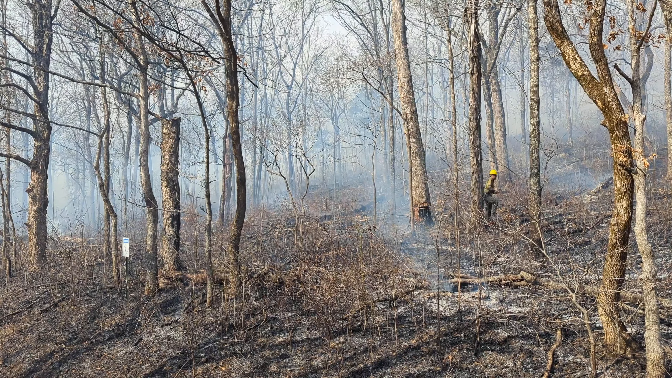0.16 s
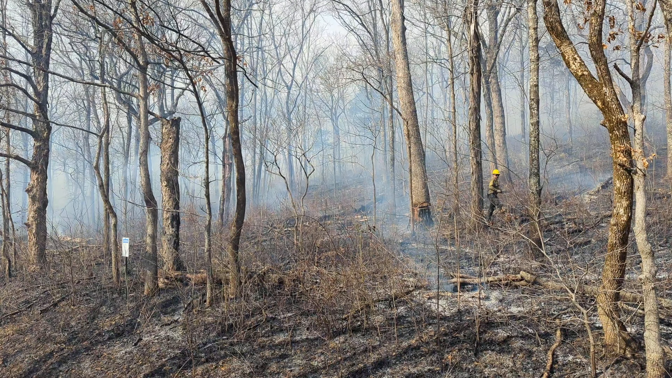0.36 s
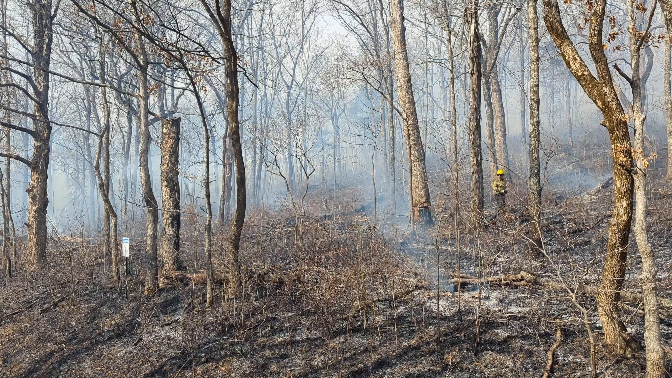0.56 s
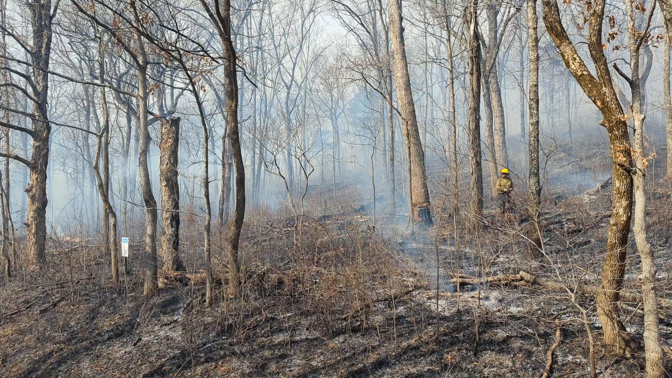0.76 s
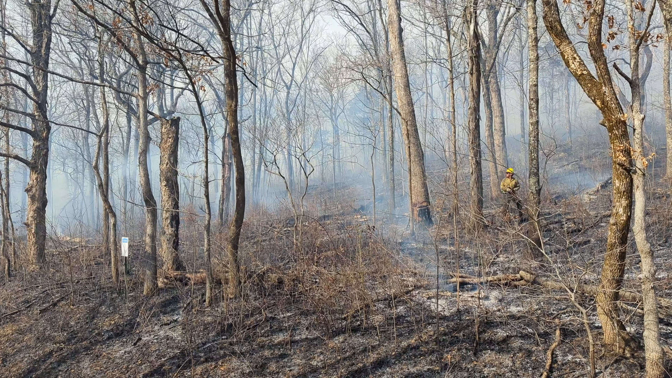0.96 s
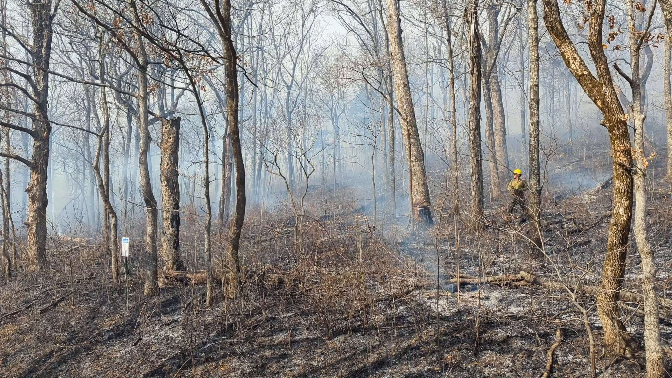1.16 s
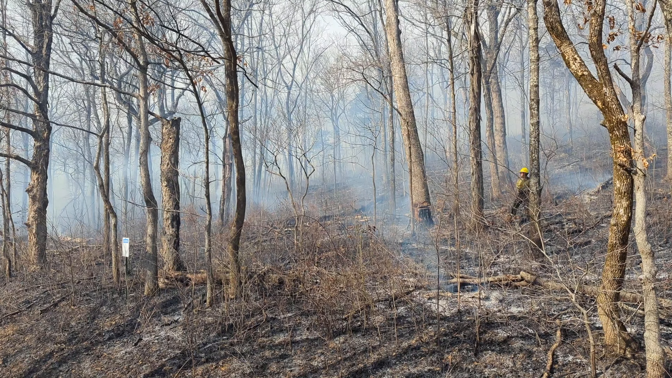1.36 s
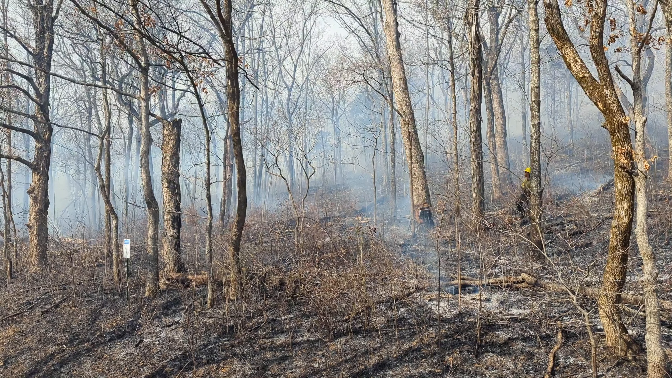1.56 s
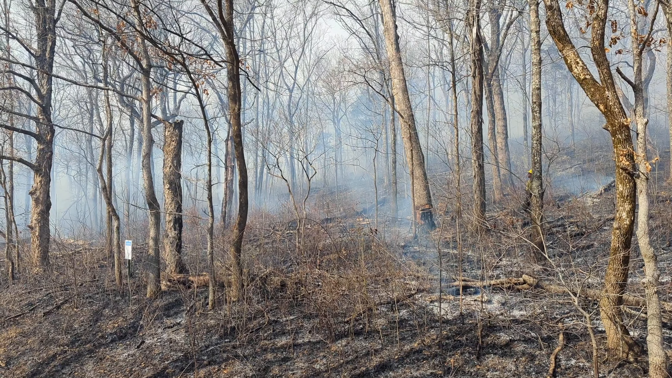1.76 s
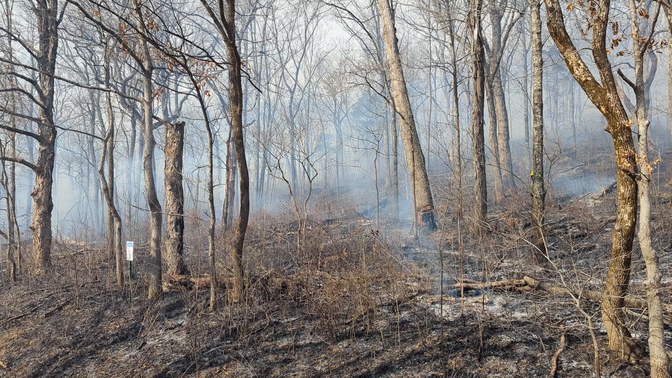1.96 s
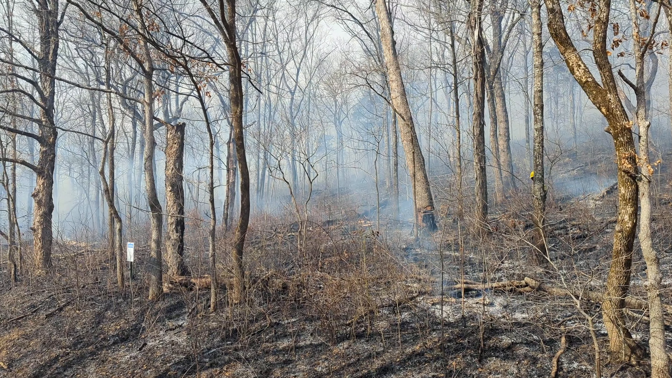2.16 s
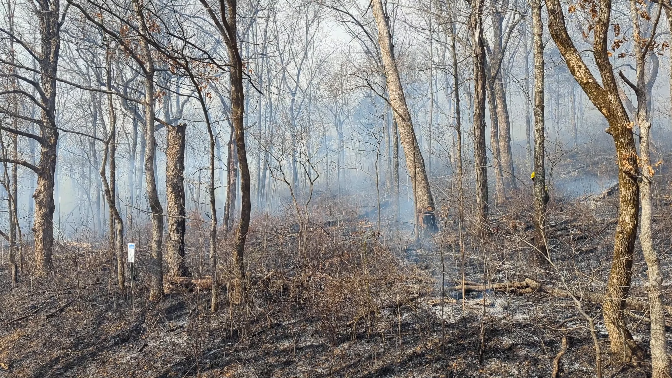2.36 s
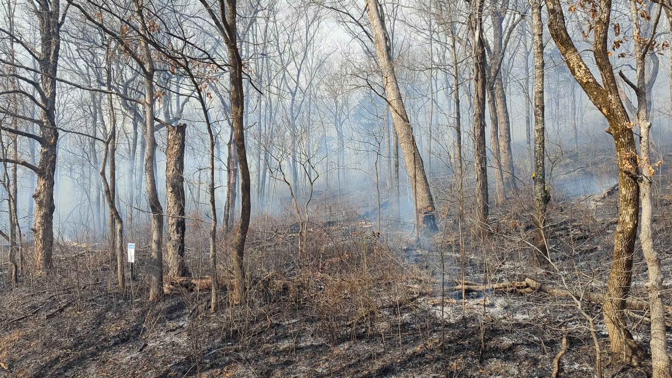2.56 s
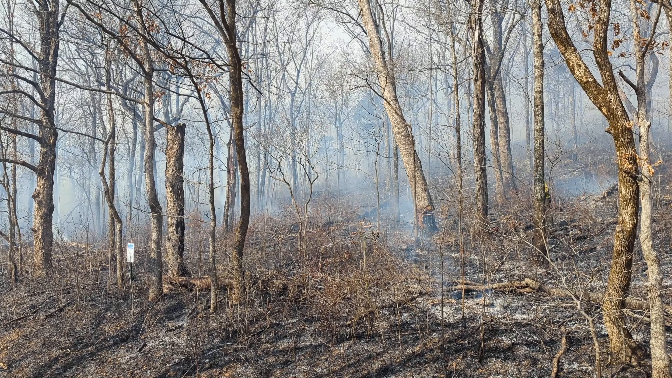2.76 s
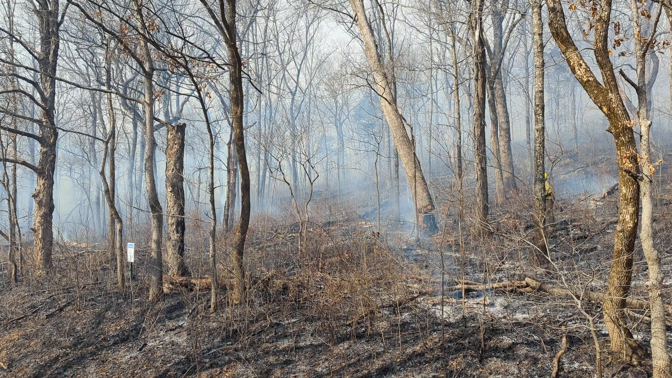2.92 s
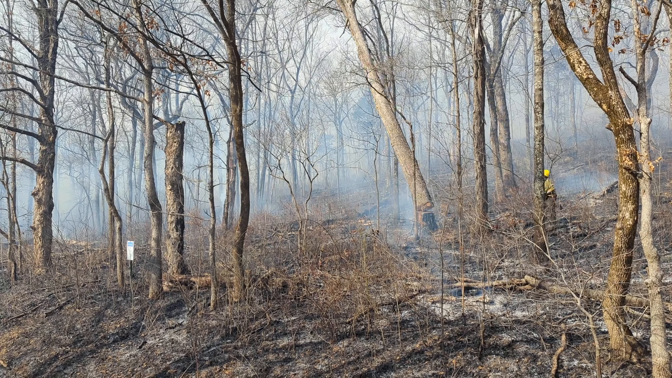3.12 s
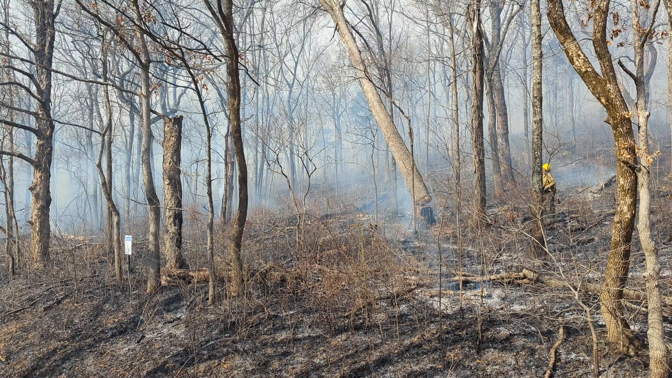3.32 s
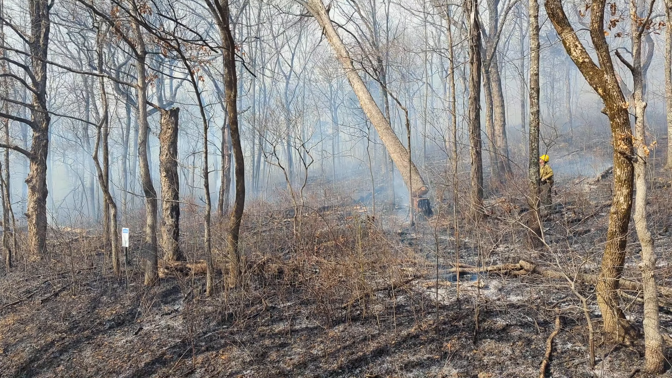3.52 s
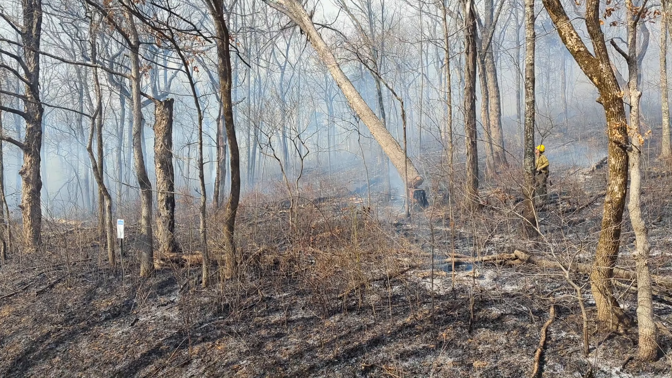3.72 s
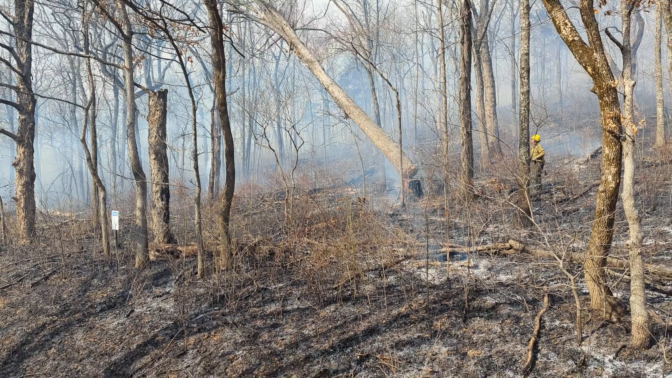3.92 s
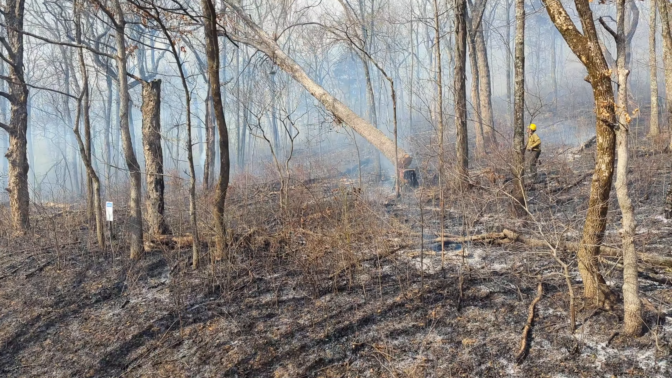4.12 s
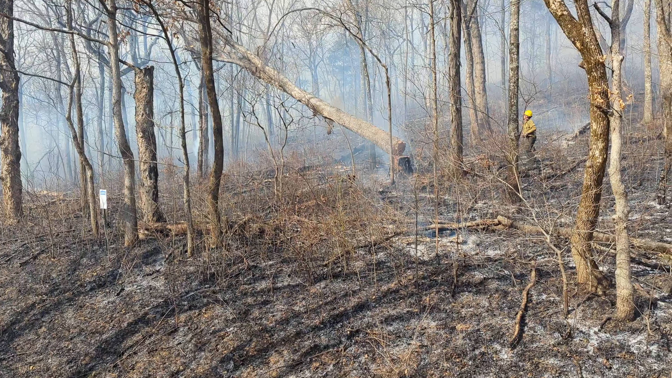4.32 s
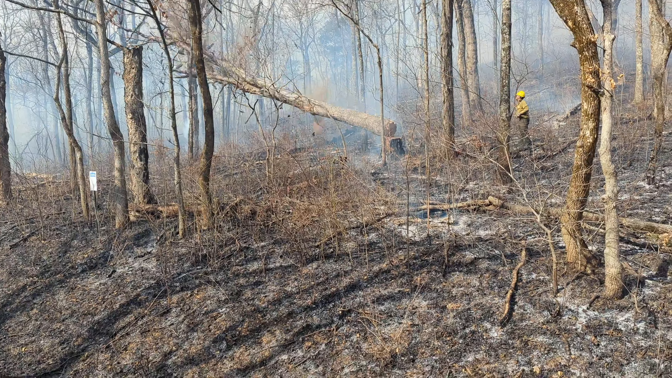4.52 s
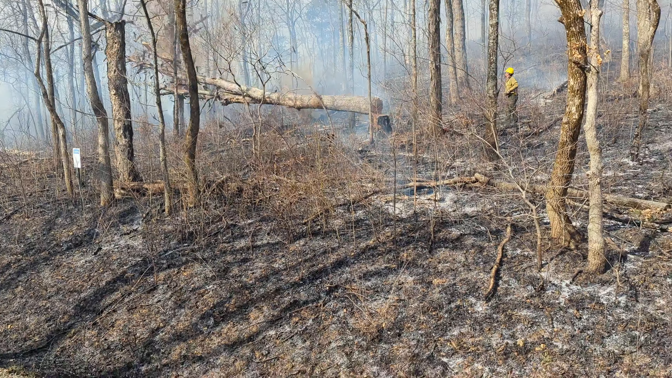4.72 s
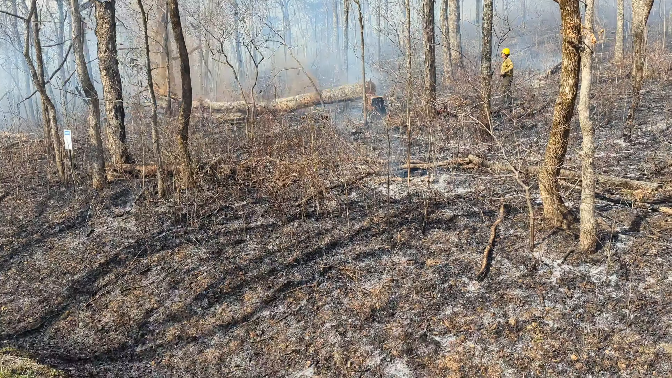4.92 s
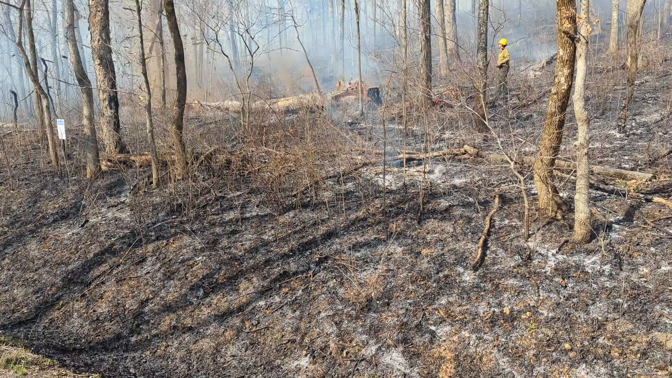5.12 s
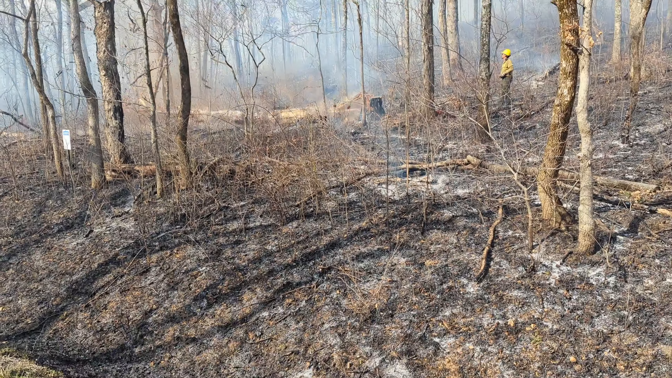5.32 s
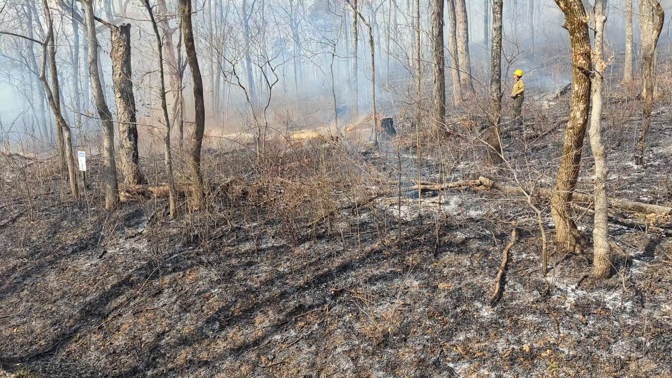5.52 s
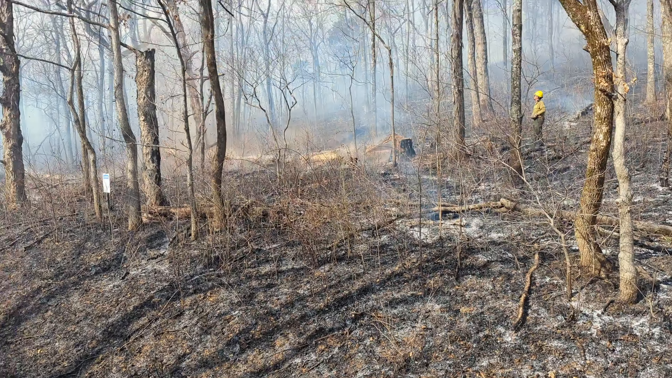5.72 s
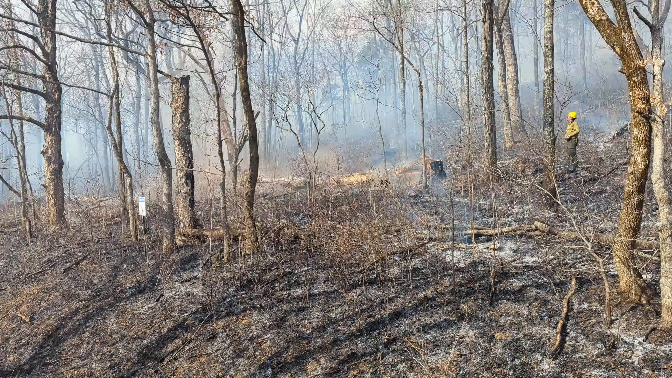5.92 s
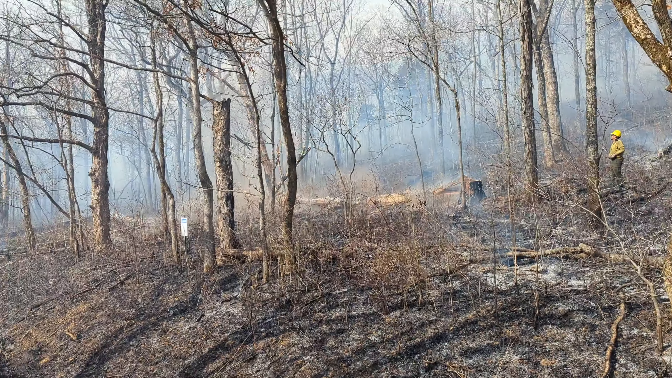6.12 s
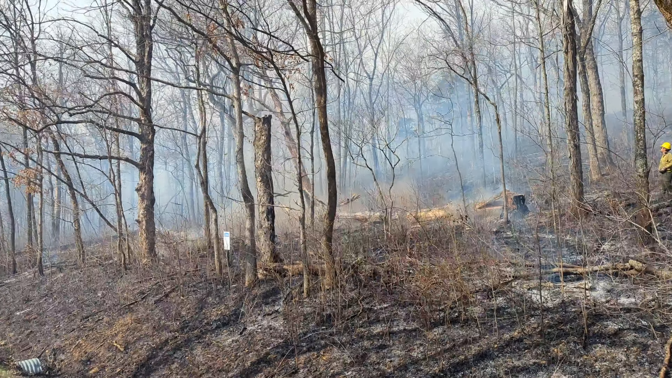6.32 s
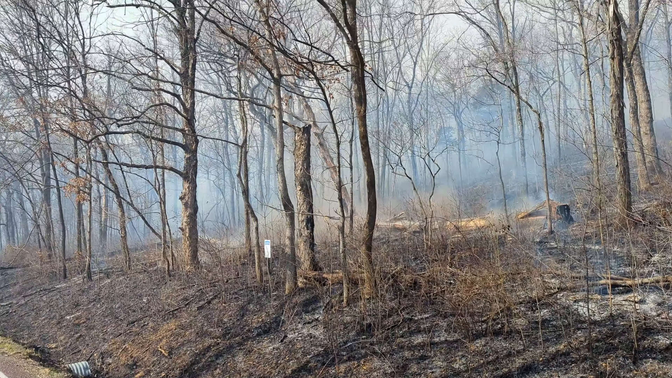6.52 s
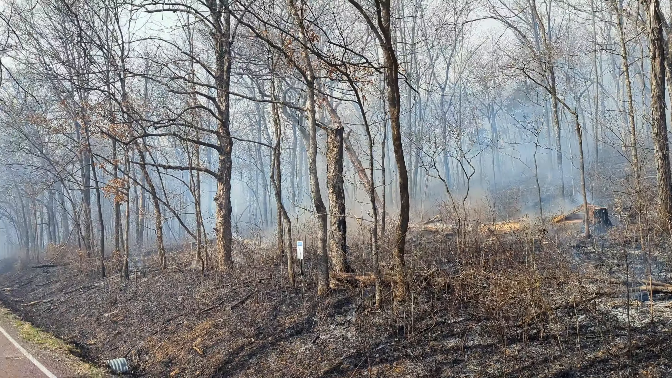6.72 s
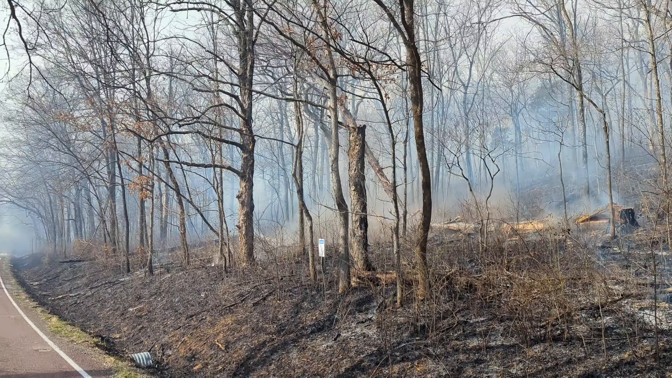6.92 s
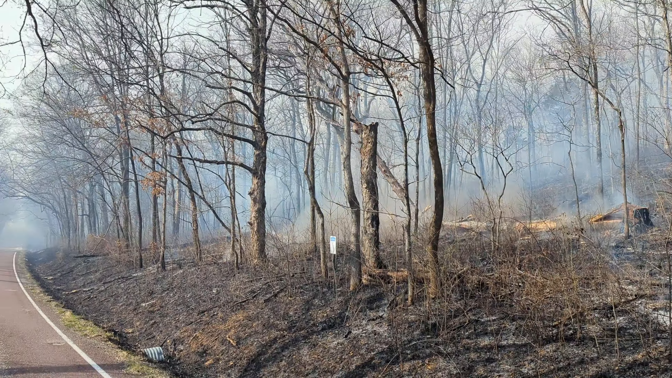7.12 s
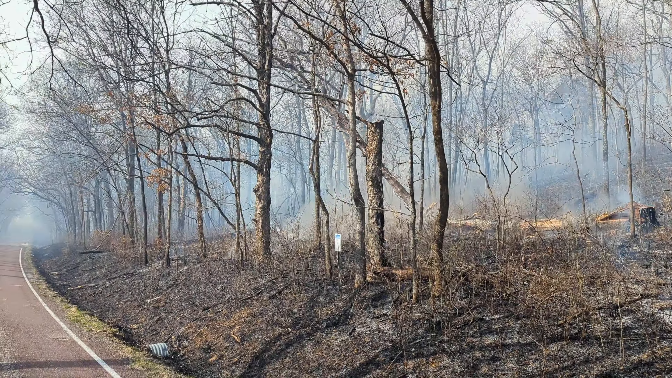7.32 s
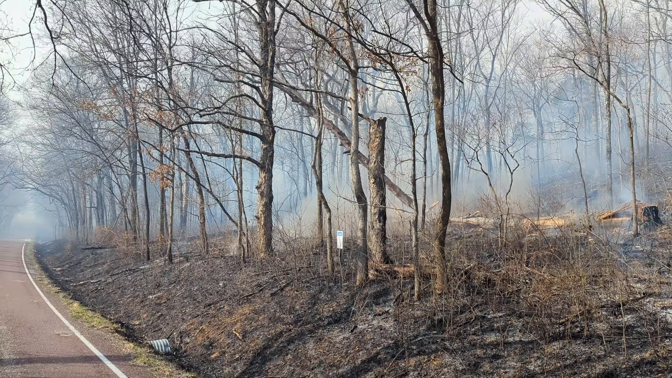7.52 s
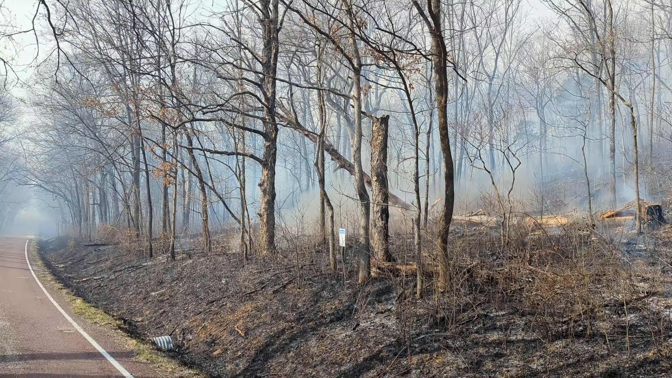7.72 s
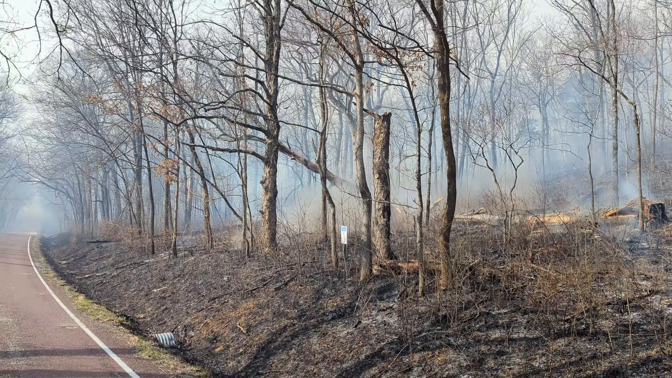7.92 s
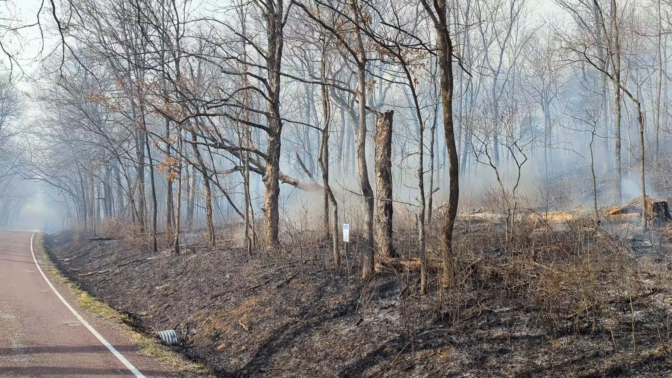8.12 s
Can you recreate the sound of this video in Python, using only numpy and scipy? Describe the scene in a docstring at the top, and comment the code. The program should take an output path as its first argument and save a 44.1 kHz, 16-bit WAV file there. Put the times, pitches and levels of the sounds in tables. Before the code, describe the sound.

Sparse wood snaps and a short creak in a quiet forest, then a felled tree crashes down with splintering cracks and thuds, before another begins breaking.

```python
"""A bare forest: a cut tree leans, its hinge fibres snap, it tears through the crowns and thuds down; debris
rains, a loose limb lands and a second tree starts to fall. Cracks and thuds are short tuned bursts with a tail
scattered by the trunks, breaking wood is crackling noise, the hinge creaks on irregular slips and a faint far
tone dies away at the start. Two microphone ports hear it, the right one through a resonant cavity."""
import sys
import numpy as np
from scipy import signal
from scipy.fft import rfft, irfft, next_fast_len
from scipy.io import wavfile
from scipy.ndimage import uniform_filter1d

SR = 44100
rng = np.random.default_rng(int(sys.argv[2]) if len(sys.argv) > 2 else 0)


def unload_wav(signal):
    """Save mono or channel-first audio to the path in sys.argv[1] as 16-bit WAV at rate SR, clipped to [-1, 1]."""
    wavfile.write(
        sys.argv[1],
        SR,
        np.round(np.clip(np.atleast_2d(signal).T, -1, 1) * 32767).astype(np.int16),
    )


N = 364707

# Spectrum of snapping twigs. Each row: frequency in Hz, gain in dB.
TWIG_SPECTRUM = [(1200, -17.5), (2400, -6), (3500, -5.5), (6000, -5), (9000, -7.5), (16000, -10)]


def amp(db):
    """dB to gain."""
    return 10 ** (np.asarray(db) / 20)


def unit(x):
    """Scaled to rms 1."""
    return x / np.sqrt(np.mean(x ** 2) + 1e-20)


def along(points, hz):
    """(Hz, value) points interpolated on a log frequency axis."""
    point_hz, value = np.transpose(points)
    return np.interp(np.log(hz + 1), np.log(point_hz + 1), value)


def curves(rows):
    """One value per sample for each column after the time in seconds."""
    time_s, *columns = np.transpose(rows)
    return [np.interp(np.arange(N) / SR, time_s, column) for column in columns]


def filtered(x, response):
    """x times a complex response of frequency, zero-padded."""
    n = x.shape[-1]
    padded = next_fast_len(n + 4096)
    spectrum = rfft(x, padded) * response(np.fft.rfftfreq(padded, 1 / SR))
    return irfft(spectrum, padded)[..., :n]


def causal(points):
    """Minimum-phase response with these (Hz, dB) gains, by folding the cepstrum."""
    def response(hz):
        cepstrum = irfft(np.log(amp(along(points, hz))))
        half = len(cepstrum) // 2
        cepstrum[1:half] *= 2
        cepstrum[half + 1:] = 0
        return np.exp(rfft(cepstrum))
    return response


def resonance(centre_hz, q):
    """Band-pass response of one damped mode, gain 1 at its centre."""
    def response(hz):
        damping = 1j * hz * centre_hz / q
        return damping / (centre_hz ** 2 - hz * hz + damping)
    return response


def ports(x, lag_ms):
    """A sound from one direction reaches the left port later than the right by the lag."""
    side = np.array([[1], [-1]])  # half the lag each way
    return filtered(x, lambda hz: np.exp(-1j * np.pi * hz * lag_ms / 1000 * side))


def burst(length_s):
    """Time, noise and an envelope that swells fast, peaks at length / e and sinks slower."""
    t = np.arange(SR // 5) / SR
    u = np.e * t / max(length_s, .001)
    return t, rng.standard_normal(len(t)), u * np.exp(-u)


def add(track, start_s, peak_db, sound, lag_ms):
    """Lays one sound at its time, peak level and direction."""
    spot = track[:, round(start_s * SR):][:, :len(sound)]
    gain = amp(peak_db) / np.abs(sound).max()
    spot += (gain * ports(sound, lag_ms))[:, :spot.shape[1]]


def crackle(spectrum, breaks_per_s, spread_db, t60_s, wash, lag_ms, scatter_ms):
    """Many small breaks of random size from five directions over a smooth wash, rms 1."""
    total = 0
    lags_ms = lag_ms + scatter_ms * np.linspace(-1, 1, 5)
    pitches_hz = rng.permutation(np.geomspace(spectrum[1][0], spectrum[-2][0], 5))
    for direction_ms, pitch_hz in zip(lags_ms, pitches_hz):
        chance, size = rng.random(N), rng.exponential(size=N)
        breaks = (chance < breaks_per_s / SR / 5) * amp(np.minimum(spread_db * size, 18))
        envelope = signal.lfilter([1], [1, -amp(-60 / (t60_s * SR))], breaks)
        # fibres part one after another
        envelope = unit(uniform_filter1d(envelope, max(int(0.15 * t60_s * SR), 1)))
        snaps = rng.standard_normal(N) * envelope
        # thin and thick wood ring at their own pitch
        knocks = 1.13 * filtered(snaps, resonance(pitch_hz, 7.3))
        noise = snaps + knocks + wash * rng.standard_normal(N)
        total = total + ports(filtered(noise, causal(spectrum)), direction_ms)
    return unit(total)


def fading_band():
    """A faint far tone that wavers, sinks and dies: a carrier blurred by slow random wobble, with weaker bands
    above."""
    # Each row: time in seconds, pitch in Hz, level in dB.
    fading = [(0, 1340, -71), (.2, 1300, -66), (.3, 1240, -79), (.42, 1200, -86), (.47, 1200, -110)]
    # Bands over the tone. Each row: centre in Hz, width in Hz, level re the tone in dB.
    bands = [(1650, 80, -12), (2070, 80, -13)]
    pitch_hz, level_db = curves(fading)
    blur = filtered(rng.standard_normal((2, 2, N)), lambda hz: 1 / (1 + (hz / 90) ** 2))
    phase = 2 * np.pi * np.cumsum(pitch_hz) / SR
    tone = unit(blur[0] * np.sin(phase) + blur[1] * np.cos(phase))
    above = 0
    for band_hz, width_hz, band_db in bands:
        noise = rng.standard_normal((2, N))
        above = above + amp(band_db) * unit(filtered(noise, resonance(band_hz, band_hz / width_hz)))
    return amp(level_db) * (tone + above)


def forest(x):
    """Decaying noise tails scattered off the trunks, alike at both ports only in the bass."""
    # Each row: frequency in Hz, left-right correlation of the tail.
    alike = [(100, 1), (400, 0.92), (800, 0.21), (1500, 0.21), (2500, .05), (15000, .02)]
    # Each row: frequency in Hz, t60 in seconds.
    decay = [(100, 0.64), (500, 0.44), (2000, 0.4), (6000, 0.15), (15000, 0.16)]
    # Strength of the tail. Each row: frequency in Hz, gain in dB.
    echo_spectrum = [(100, -12.5), (400, -18.5), (1300, -10.5), (4000, -4), (12000, -3)]
    echoes = np.zeros((2, N + SR))
    step = SR // 16  # each moment's blows meet other trunks
    delay = 300  # samples
    for start in range(0, N, step):
        hz, t, noise = signal.stft(rng.standard_normal((2, SR // 3)), SR, nperseg=256)
        angle = np.arccos(np.clip(along(alike, hz), -1, 1))[:, None] / 2
        mid, side = noise[0] * np.cos(angle), noise[1] * np.sin(angle)
        fade = amp(-60 * t / along(decay, hz)[:, None])
        tail = signal.istft(np.array([mid + side, mid - side]) * fade, SR, nperseg=256)[1]
        tail = tail / np.linalg.norm(tail[0])
        blows = x[:, start:start + step].mean(axis=0)[None]
        answer = signal.fftconvolve(blows, tail, axes=1)
        echoes[:, start + delay:][:, :answer.shape[1]] += answer
    return filtered(echoes[:, :N], causal(echo_spectrum))


def crash():
    """Branches, twigs, limbs and trunk break at their own density, all driven by one strength."""
    # Wood breaking between the loud cracks. Each row: time in seconds, strength in dB,
    # trunk weight re strength in dB, twigs and leaves re strength in dB.
    breaking = [(0, -78.5, -4, -1.5), (.65, -80, 0, 12.5), (0.92, -76.5, -4, 1.5), (1.15, -67.5, -8, 0),
                (1.95, -69, -17, 8.5), (2.15, -49.5, -21, -4), (2.6, -50.5, -19, 4.5),
                (2.85, -45.5, -23, -0.5), (3.1, -52.5, -17, 2.5), (3.62, -51, -15.5, -4),
                (3.9, -27.5, -12, -4.5), (4.1, -24, -12.5, -8.5), (4.8, -22, -4, -19),
                (5.05, -21, -1.5, -5.5), (5.25, -25, -9, -7), (5.55, -27.5, -6.5, -12.5),
                (5.75, -34.5, -2.5, -4), (6.4, -42.5, -12, -1.5), (6.6, -36, -6, -2),
                (6.8, -42.5, -13, -5.5), (7.5, -40.5, -9.5, 0.5), (7.85, -29.5, -23, -8),
                (8.07, -40.5, -3, -2), (8.16, -34.5, -10, -3), (8.27, -22, -15, -1.5)]
    # Spectra of branches, limbs and trunk. Each row: frequency in Hz, gain in dB.
    branch_spectrum = [(250, -27.5), (500, -1), (1000, -0.5), (2000, -1), (3000, -9.5), (5000, -21)]
    limb_spectrum = [(110, -27.5), (190, 3), (300, 3), (480, 2.5), (650, -3), (1000, -47)]
    trunk_spectrum = [(20, -41), (40, -12.5), (70, -6), (130, -2.5), (190, -8.5), (300, -39), (600, -69)]
    limb_db, limb_weight_share = -2, 0.28
    limb_floor_db, trunk_floor_db = -78.5, -76.5  # low stir when nothing breaks

    strength_db, weight_db, twig_db = curves(breaking)
    limb_gain = np.hypot(amp(strength_db + limb_db + limb_weight_share * weight_db), amp(limb_floor_db))
    trunk_gain = np.hypot(amp(strength_db + weight_db), amp(trunk_floor_db))
    branches = amp(strength_db) * crackle(branch_spectrum, breaks_per_s=200, spread_db=7.1, t60_s=0.062,
                                          wash=1.0, lag_ms=-0.155, scatter_ms=0.21)
    twigs = amp(strength_db + twig_db) * crackle(TWIG_SPECTRUM, breaks_per_s=400, spread_db=3.5, t60_s=0.019,
                                                 wash=1.0, lag_ms=-0.1, scatter_ms=0.2354)
    limbs = limb_gain * crackle(limb_spectrum, breaks_per_s=80, spread_db=8.9, t60_s=0.096,
                                wash=1.0, lag_ms=-0.14, scatter_ms=0.3)
    trunk = trunk_gain * crackle(trunk_spectrum, breaks_per_s=60, spread_db=3.2, t60_s=0.28,
                                 wash=0.47, lag_ms=-0.04, scatter_ms=0.22)
    return branches + twigs + limbs + trunk


def creak():
    """Uneven slips of the tearing hinge ring two wood modes that rise as it thins."""
    # Each row: time in seconds, lower mode in Hz, level in dB.
    hinge = [(2.4, 1113, -75), (2.48, 1140, -52.5), (2.6, 1152, -52), (2.752, 1226, -48), (2.87, 1294, -49),
             (2.95, 1293, -78)]
    mode_hz, level_db = curves(hinge)
    start, stop = round(hinge[0][0] * SR), round(hinge[-1][0] * SR)
    slips_per_s, ring_t60_s = 130, 0.072
    slips = (rng.random(N) < slips_per_s / SR) * rng.standard_normal((2, N))
    slips = uniform_filter1d(slips, size=90)
    ring = signal.lfilter([1], [1, -amp(-60 / (ring_t60_s * SR))], slips)
    phase = 2 * np.pi * np.cumsum(mode_hz) / SR
    modes = ring[0] * np.sin(phase) + 0.55 * ring[1] * np.sin(1.3 * phase)
    sound = np.zeros(N)
    sound[start:stop] = unit(modes[start:stop])
    return ports(amp(level_db) * sound, lag_ms=-.05)


def thuds():
    """Heavy limbs and trunk striking: a few low cycles that swell and sink, with a rough edge."""
    # Each row: start in seconds, dry peak in dB, pitch in Hz, length in seconds.
    blows = [(0.27, -56.0, 75, 0.027), (2.217, -43, 226, 0.023), (2.528, -39.5, 222, 0.024),
             (2.954, -42.5, 403, 0.022), (2.971, -41.5, 239, 0.024), (3.817, -21, 504, 0.033),
             (3.82, -21, 244, 0.037), (3.868, -20, 430, 0.047), (3.984, -8.5, 461.5, 0.033),
             (3.988, -10.5, 227, 0.011), (4.097, -6, 225, 0.027), (4.158, -11.5, 522, 0.0095),
             (4.232, -15.5, 129.4, 0.037), (4.266, -8.0, 514, 0.02), (4.281, -11, 183, 0.027),
             (4.42, -10, 203, 0.038), (4.449, -10, 282, 0.04), (4.532, -10, 414, 0.0075),
             (4.685, -11, 414, 0.019), (4.72, -16, 388, 0.043), (4.736, -6.5, 145, 0.018),
             (4.86, -7, 445, 0.019), (4.865, -7.5, 156, 0.032), (4.881, -11, 121, 0.025),
             (5.008, -10, 166.5, 0.05), (5.088, -8.5, 188, 0.04), (5.111, -12, 317, 0.0086),
             (5.136, -11, 128, 0.016), (5.376, -17.5, 425, 0.019), (5.377, -11, 181, 0.016),
             (5.498, -18, 459, 0.041), (5.502, -18, 169, 0.029), (6.463, -21.5, 468, 0.01),
             (6.521, -11, 271, 0.032), (6.524, -6.0, 192, 0.016), (6.548, -8.5, 180, 0.0077),
             (6.603, -30, 95, 0.033), (7.04, -32, 102, 0.046), (7.588, -21.5, 398.5, 0.06),
             (7.648, -22.5, 536, 0.037), (7.715, -27, 329, 0.038), (7.91, -22, 152, 0.024),
             (7.951, -12.5, 182, 0.021), (8.031, -16, 217, 0.0095), (8.142, -18.5, 427, 0.013),
             (8.181, -21, 430, 0.032)]
    track = np.zeros((2, N))
    for start_s, peak_db, pitch_hz, length_s in blows:
        t, noise, envelope = burst(length_s)
        tone = np.sin(2 * np.pi * pitch_hz * t)
        rough = unit(filtered(noise, resonance(pitch_hz, 3.9)))
        push = np.sin(2 * np.pi * 0.46 * pitch_hz * t)  # the ground gives under the blow
        add(track, start_s, peak_db, envelope * (tone + 0.68 * rough + 0.2 * push), lag_ms=-.15)
    return track


def ticks():
    """Dry twig ticks and splinter bursts: short enveloped noise without a pitch."""
    # Each row: start in seconds, dry peak in dB, length in seconds (at least 0.001 is used).
    twig_ticks = [(0.261, -41.5, 0.0019), (0.4695, -47, 0.0026), (0.5913, -31.5, 0.0061),
                  (0.976, -37.5, 0.0025), (1.15, -48, 0.0023), (1.3847, -29.5, 0.0017),
                  (1.665, -39, 0.0025), (1.73, -32, 0.0024), (1.761, -28.5, 0.002), (1.867, -31.5, 0.0032),
                  (2.025, -25, 0.0024), (2.054, -31.5, 0.0035), (2.101, -35, 0.0023),
                  (2.239, -32.5, 0.0075), (2.404, -37, 0.0024), (2.509, -33.5, 0.0034),
                  (2.642, -20, 0.0015), (2.673, -27, 0.0045), (2.683, -14, 0.001), (2.801, -23, 0.0038),
                  (2.8502, -24, 0.0029), (2.867, -30, 0.0016), (3.137, -25.5, 0.0024),
                  (3.683, -27.5, 0.0058), (3.824, -17, 0.013), (3.886, -12, 0.0013), (4.165, -17, 0.0053),
                  (4.204, -14.5, 0.01), (4.628, -10.5, 0.005), (4.641, -10.5, 0.006), (4.867, -19, 0.0059),
                  (4.877, -10, 0.0033), (5.0673, -7, 0.011), (5.0937, -4.5, 0.0035), (5.2424, -7, 0.0039),
                  (5.256, -5.5, 0.0054), (5.282, -7, 0.00092), (5.2898, -8, 0.0022), (5.374, -13.5, 0.019),
                  (5.387, -9.5, 0.0052), (5.617, -12, 0.0007), (5.642, -11.5, 0.0021),
                  (5.941, -18.5, 0.0015), (6.5963, -11, 0.0014), (6.621, -16, 0.0022),
                  (6.786, -23.5, 0.005), (6.906, -17.5, 0.0027), (7.045, -17.5, 0.014),
                  (7.2776, -20.5, 0.003), (7.316, -19.0, 0.0062), (7.373, -21, 0.0048),
                  (7.787, -17.5, 0.006), (8.118, -15.5, 0.011), (8.2043, -12, 0.009)]
    track = np.zeros((2, N))
    for start_s, peak_db, length_s in twig_ticks:
        _, noise, envelope = burst(length_s)
        tick = filtered(noise * envelope, causal(TWIG_SPECTRUM))
        add(track, start_s, peak_db, tick, lag_ms=rng.normal(-.1, 0.1354))
    return track


def cracks():
    """Each broken piece rings briefly at its pitch while its fibres splinter."""
    # Each row: start in seconds, dry peak in dB, wood pitch in Hz, length in seconds.
    breaks = [(0.594, -41, 1270, 0.0042), (1.3874, -30, 1340, 0.0045), (1.666, -43.5, 1180, 0.0072),
              (1.73, -30.5, 1180, 0.004), (1.865, -38, 1180, 0.0048), (2.052, -31.5, 960, 0.0069),
              (2.091, -38, 900, 0.0051), (2.103, -25.5, 1130, 0.0046), (2.119, -30, 1160, 0.012),
              (2.174, -27.5, 2290, 0.037), (2.242, -28, 1090, 0.004), (2.406, -29.5, 1530, 0.0079),
              (2.529, -35, 1200, 0.022), (2.567, -33, 1120, 0.027), (2.645, -29, 1210, 0.005),
              (2.6746, -33, 1580, 0.014), (2.779, -25, 1628, 0.0034), (2.842, -28, 1340, 0.012),
              (3.448, -33.5, 1600, 0.0062), (3.678, -31, 760, 0.011), (3.74, -25, 973, 0.013),
              (3.823, -12, 2030, 0.018), (3.8826, -11.5, 1118, 0.018), (3.979, -11, 900, 0.021),
              (4.014, -9, 1020, 0.0044), (4.067, -8.5, 780, 0.0097), (4.104, -8, 832, 0.018),
              (4.159, -7, 1110, 0.012), (4.272, -13, 927, 0.035), (4.3062, -6, 1030, 0.0048),
              (4.331, -7.5, 730, 0.015), (4.3606, -10.5, 790, 0.021), (4.408, -12, 960, 0.006),
              (4.442, -6, 776, 0.0053), (4.511, -6.5, 1790, 0.0084), (4.5244, -8, 2144, 0.025),
              (4.636, -10, 1065, 0.013), (4.6545, -6.5, 635, 0.0043), (4.674, -9, 800, 0.022),
              (4.726, -12, 1127, 0.041), (4.867, -16, 974, 0.028), (5.123, -5, 1040, 0.0037),
              (5.135, -8.5, 1570, 0.014), (5.166, -6.5, 1220, 0.0066), (5.18, -2, 1150, 0.005),
              (5.204, -9, 1380, 0.0037), (5.26, -10.5, 1740, 0.0038), (5.276, -10.5, 1630, 0.005),
              (5.388, -8, 980, 0.0066), (5.5064, -7.5, 835, 0.0098), (5.5135, -20.5, 1305, 0.031),
              (5.6386, -18.5, 1550, 0.0094), (6.1657, -20.5, 1160, 0.0046), (6.458, -16.5, 1164, 0.0097),
              (6.5226, -10.5, 1580, 0.0064), (6.5295, -9.5, 1610, 0.0075), (6.564, -16.5, 1570, 0.0036),
              (6.6151, -18, 1600, 0.0085), (6.845, -17.5, 1920, 0.0075), (6.906, -20.5, 1440, 0.0094),
              (7.039, -19.5, 664, 0.0069), (7.501, -24, 1090, 0.022), (7.604, -23, 993, 0.031),
              (7.657, -21, 915, 0.021), (7.723, -16.5, 795, 0.038), (7.787, -13.5, 1370, 0.0098),
              (8.111, -20.5, 1135, 0.017), (8.125, -14.5, 946, 0.026), (8.1842, -6.5, 1272, 0.012),
              (8.2138, -2.5, 770, 0.0061), (8.225, -10.5, 910, 0.025)]
    # Each row: frequency in Hz, gain in dB.
    splinter_spectrum = [(300, -7), (700, 1), (2000, 4), (4000, -14), (15000, -27.5)]
    track = np.zeros((2, N))
    for start_s, peak_db, pitch_hz, length_s in breaks:
        t, noise, envelope = burst(length_s)
        tone = 0.83 * np.sin(2 * np.pi * pitch_hz * t)
        ring = 1.08 * unit(filtered(noise, resonance(pitch_hz, 2.6)))
        fibres = 0.5 * unit(filtered(noise, causal(splinter_spectrum)))
        add(track, start_s, peak_db, envelope * (tone + ring + fibres), lag_ms=rng.normal(-0.12, 0.11))
    return track


def scene():
    """Single blows with their echoes over the wash of breaking wood."""
    blows = cracks() + ticks() + thuds()
    return fading_band() + forest(blows) + crash() + creak() + blows


def record(dry):
    """The right port's cavity colours its side; peaks round off softly; deep bass and top are cut."""
    # Each row: frequency in Hz, gain in dB.
    right_port = [(300, 0.5), (800, 2), (1250, 4.5), (1450, 4), (1650, 6.5), (2800, -6.5), (3600, 3),
                  (4350, 13), (5300, -4.5), (6500, 6), (7200, 4), (8100, -6), (10000, -2.5), (15000, -0.5)]
    bass_cut_hz, top_hz = 38, 15850
    x = np.array([dry[0], filtered(dry[1], causal(right_port))])
    x = x / (1 + np.abs(x / .99) ** 6) ** (1 / 6)

    def band(hz):
        return hz ** 4 / (hz ** 4 + bass_cut_hz ** 4) / (1 + (hz / top_hz) ** 300)
    return filtered(x, band)


dry = scene()
out = record(dry)
unload_wav(out)
```